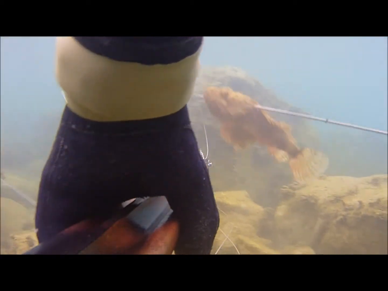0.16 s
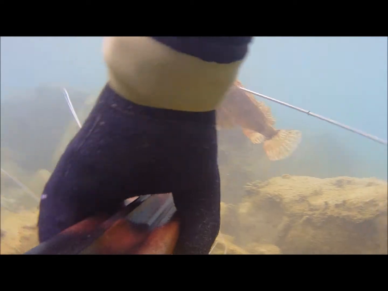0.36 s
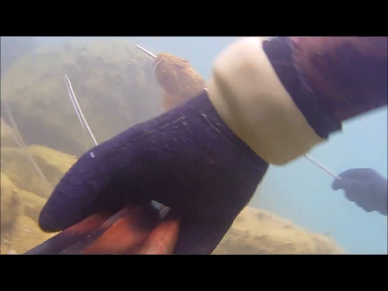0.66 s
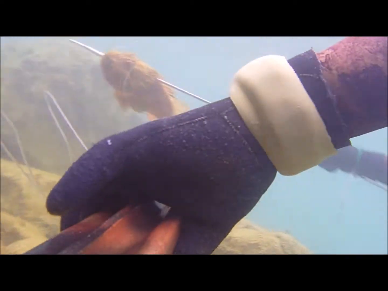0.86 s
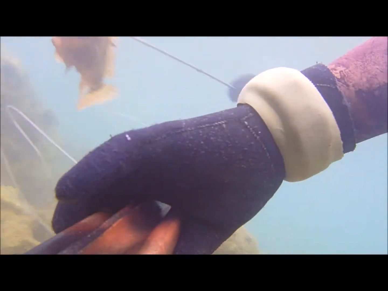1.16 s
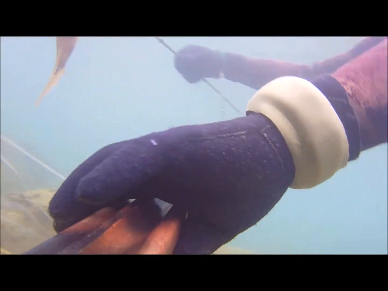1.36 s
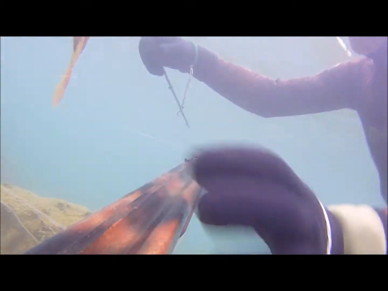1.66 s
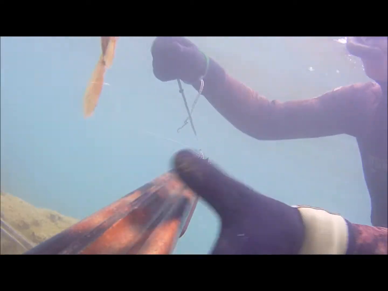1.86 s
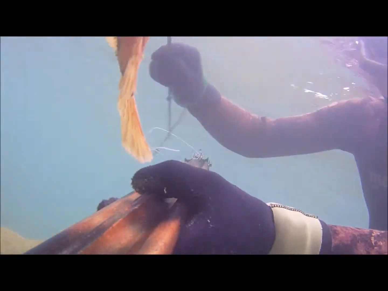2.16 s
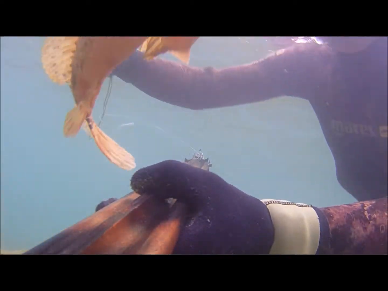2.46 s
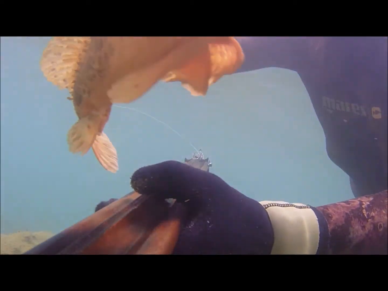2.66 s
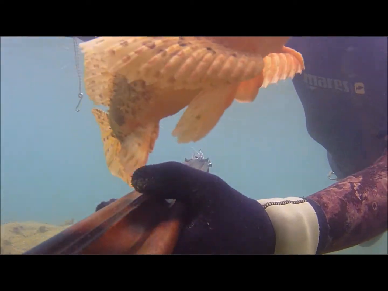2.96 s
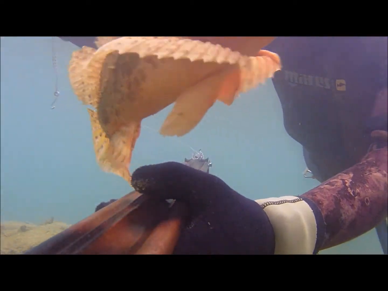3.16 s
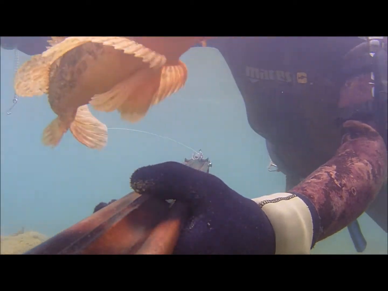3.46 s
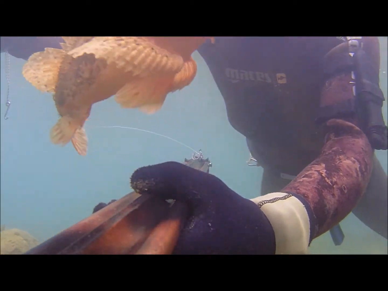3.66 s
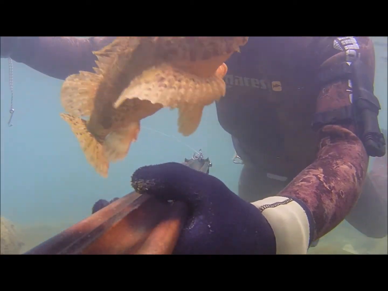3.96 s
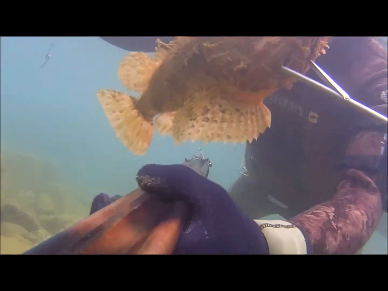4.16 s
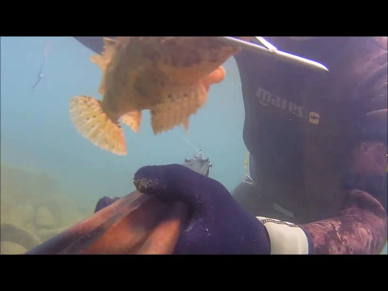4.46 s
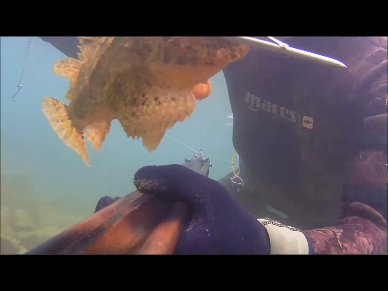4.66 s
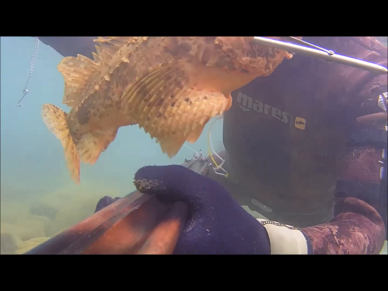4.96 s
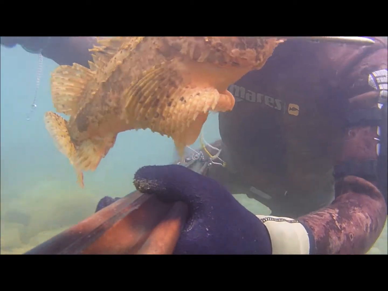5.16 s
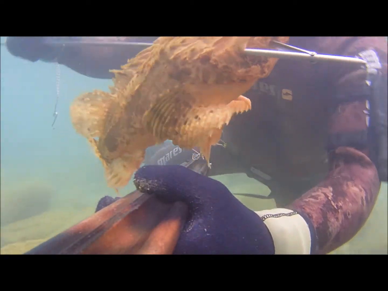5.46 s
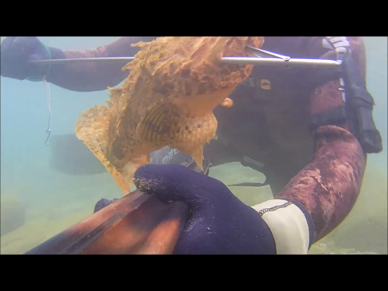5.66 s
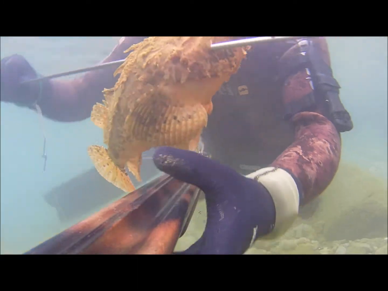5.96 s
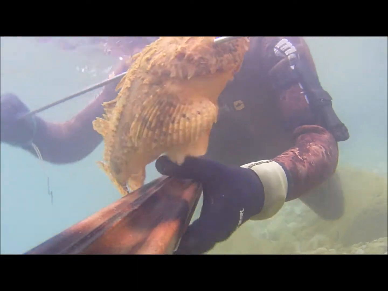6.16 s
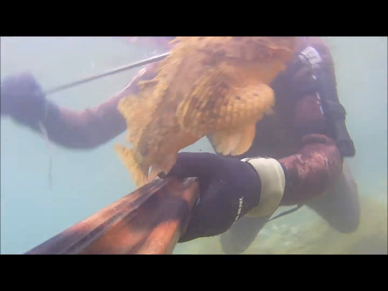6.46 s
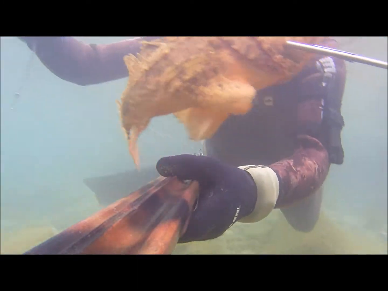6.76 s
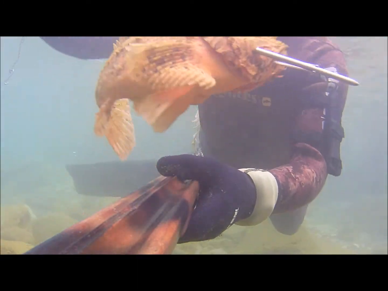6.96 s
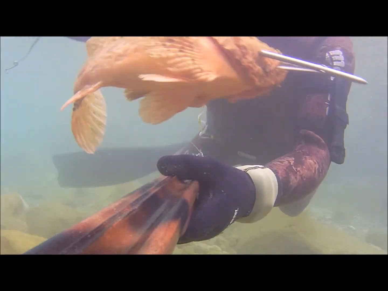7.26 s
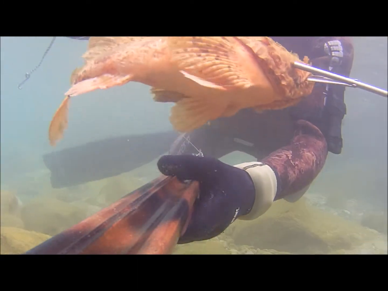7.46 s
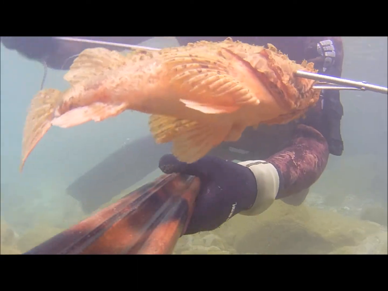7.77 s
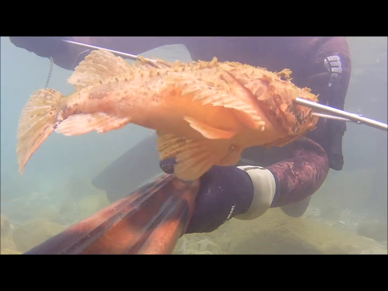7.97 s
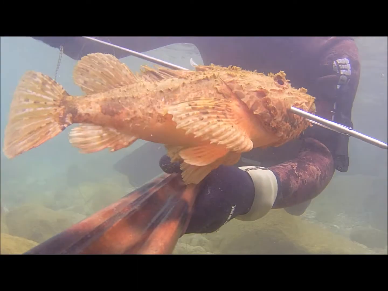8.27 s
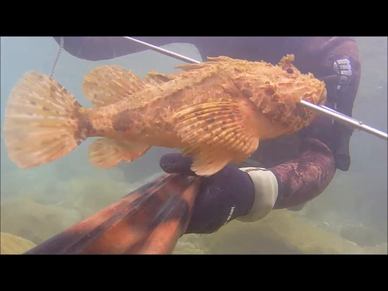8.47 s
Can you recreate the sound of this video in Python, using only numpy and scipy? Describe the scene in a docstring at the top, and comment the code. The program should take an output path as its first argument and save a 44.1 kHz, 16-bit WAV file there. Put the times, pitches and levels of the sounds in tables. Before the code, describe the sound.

A speargun fires underwater with a hard, distorted bang and low thump, amid quiet gear taps, soft rubbing and a dull, bassy watery hush.

```python
"""Under water, on a wooden speargun: one microphone in a sealed camera housing rides on the gun, close to the hands.
A hard release rattles the gun, swings the mount and overloads the recorder; blows and loose clicks ring dull modes.
Loose gear taps the gun and a gloved hand rubs it: short pushes and stick-slip grains stir the same modes.
The mount sways near 47 Hz, harder at each shove of the hand; small ticks and bumps are short decaying rings.
Behind it all lies steady, bass-heavy water and recorder noise."""
import sys
import numpy as np
from scipy import signal
from scipy.fft import rfft, irfft
from scipy.io import wavfile

SR = 44100
rng = np.random.default_rng(int(sys.argv[2]) if len(sys.argv) > 2 else 0)


def to_wav(sig):
    """Store sig (one row per channel, or 1-D mono) as 16-bit WAV at the path in sys.argv[1].

    Samples outside -1..1 are clipped; the rate is SR.
    """
    pcm = np.clip(np.atleast_2d(sig), -1, 1) * 32767
    pcm = np.round(pcm).astype(np.int16)
    wavfile.write(sys.argv[1], SR, pcm.T)  # frames by channels


N = 380141
TIME = np.arange(N) / SR   # seconds
FULL_SCALE = .46   # the recorder's overload level; every absolute level_db is relative to 1.0 ahead of the recorder


def from_db(db):
    """Decibels to gain."""
    return 10 ** (np.asarray(db) / 20)


def rms_one(x):
    """Scale to rms 1."""
    return x / np.sqrt(np.mean(x ** 2) + 1e-20)


def band(x, low_hz, high_hz, order):
    """Keep what lies between two frequencies."""
    return signal.sosfilt(signal.butter(order, [low_hz, high_hz], "band", fs=SR, output="sos"), x)


def drift(rate_hz):
    """Slow random wander of spread 1, drawn every 40 samples and joined by straight lines."""
    step = 40
    pole = np.exp(-2 * np.pi * rate_hz * step / SR)
    noise = rng.standard_normal(N // step + 2002)
    slow = signal.lfilter([1], [1, -2 * pole, pole * pole], noise)[2000:]   # drop the filter's start-up
    return np.interp(np.arange(N) / step, np.arange(len(slow)), rms_one(slow))


def ring(force, hz, t60_s):
    """One resonant mode: a unit click sets a decaying sine of height 1 ringing."""
    radius = from_db(-60 / (t60_s * SR))
    angle = 2 * np.pi * hz / SR
    return signal.lfilter([0, np.sin(angle)], [1, -2 * radius * np.cos(angle), radius ** 2], force + 1e-18)


def swell(start_s, rise_s, held_s, db, fall_db_per_s):
    """Gain that rises smoothly, holds, then dies at a steady rate in dB (the fall lasts up to 1 s)."""
    rise = np.sin(np.pi / 2 * np.clip((TIME - start_s) / rise_s, 0, 1)) ** 2
    falling_s = np.clip(TIME - start_s - rise_s - held_s, 0, 1)
    return rise * from_db(db - fall_db_per_s * falling_s)


# Housing and stock modes: pitch_hz, t60_s of a struck ring, soft_db and hard_db for a soft and a hard contact
MODES = [(276, 0.018, -21, -9), (372.6, 0.031, -8, -28), (496, 0.043, -8, -16.5), (678, 0.046, 0.5, -19.5),
         (740, 0.036, -3, -22), (940, 0.02, -10.5, 0.5), (1348, 0.019, -9.5, -8), (1618, 0.019, -28, 2),
         (2190, 0.017, -30, -33), (2788, 0.0048, -58, -6), (3380, 0.0083, -51, -17.5),
         (4700, 0.0019, -46, -28)]


def blows(table, scatter_db):
    """Each contact is a short push that swells and dies; hardness and tilt set which modes it reaches."""
    start_s, level_db, hardness, tilt_db = np.transpose(table)
    hardness = np.clip(hardness, 0, 1)
    size = 600   # samples per push
    # harder contacts are shorter; this time constant is three times that of the push's decay
    contact_ms = np.clip(3.4 - 2.96 * hardness, .3, 12)
    age = np.arange(size) / (contact_ms[:, None] * SR / 1000)
    push = age * np.exp(-3.0 * age)
    push /= push.sum(axis=1, keepdims=True)
    at = np.round(start_s * SR).astype(int)[:, None] + np.arange(size)
    luck = rng.standard_normal((len(start_s), len(MODES)))
    out = np.zeros(N)
    for k, (hz, t60_s, soft_db, hard_db) in enumerate(MODES):
        mode_db = (1 - hardness) * soft_db + hardness * hard_db
        db = level_db + mode_db + tilt_db * np.log2(hz / 1000)
        # the contact chatters near the mode's pitch, so the ring builds up over the push
        pitch_hz = hz * (1 + .03 * luck[:, [k - 2]])
        phase = luck[:, [k - 1]]
        chatter = 2 * push * np.cos(2 * np.pi * pitch_hz * np.arange(size) / SR + phase)
        gain = from_db(db + scatter_db * luck[:, k])
        force = np.zeros(N)
        np.add.at(force, at, gain[:, None] * chatter)
        out += ring(force, hz, t60_s)
    return out


def rattle():
    """Loose parts buzz against the stock while the bands let go: uneven clicks into the modes plus bare fizz."""
    clicks_per_s = 12000
    clicks = rng.standard_normal(N) ** 3 * (rng.random(N) < clicks_per_s / SR)
    body = sum(from_db(soft_db) * rms_one(ring(clicks, hz, t60_s)) for hz, t60_s, soft_db, _ in MODES)
    fizz = band(clicks, 2500, 8000, order=3)
    start_s, rise_s, held_s = 4.059, 0.013, 0.031
    shake = swell(start_s, rise_s, held_s, db=-16, fall_db_per_s=1197)   # stops short
    shake += swell(start_s, rise_s, held_s, db=-25, fall_db_per_s=442)   # a faint rest settles slowly
    return shake * rms_one(body) + from_db(-15.0) * shake ** 2 * rms_one(fizz)   # harder shaking is brighter


# Blows of the release: start_s, level_db before mode and tilt gains, hardness (0-1), tilt_db per octave about 1 kHz
RELEASE_BLOWS = [(4.0605, -11.5, 0.12, -2.5), (4.0685, -10.5, 0.01, -2), (4.073, -15, 0.03, -7),
                 (4.0785, -7.5, 0.94, 10.5), (4.0822, 5.5, 0.7, 2), (4.0848, 6, 0.6, 2),
                 (4.0905, -22, 1, 21.5), (4.0965, -17, 0.4, -5), (4.099, -3, 0.65, 2), (4.1015, -2, 0.8, 5),
                 (4.107, -10, 0.89, -1), (4.111, -26, 0.7, 6), (4.1265, -18, 0.7, 7),
                 (4.1315, -10, 0.76, 4.5), (4.1345, -22, 0.3, -11.5), (4.1435, -14.5, 0.78, -7),
                 (4.1455, -21, 0.82, 1)]


def release():
    """Blows and rattle, with the rumble below about 200 Hz cut."""
    low_cut = signal.butter(2, 200, "high", fs=SR, output="sos")
    return signal.sosfilt(low_cut, blows(RELEASE_BLOWS, scatter_db=3.0) + rattle())


# Taps on the gun: start_s, level_db before mode and tilt gains, hardness (0-1), tilt_db per octave about 1 kHz
GEAR_TAPS = [(0.101, -37, 0.1, 2.5), (0.8, -39, 0.5, -3), (1.496, -34, 0.3, -2.5),
             (1.709, -31.5, 0.17, 15.5), (1.772, -31.5, 0.1, 5), (1.779, -41, 0.25, 18),
             (1.802, -42, 0.05, 8), (1.807, -28.5, 0.12, 6), (1.866, -32.5, 0.27, 7.5),
             (2.067, -29, 0.75, -3), (2.071, -31, 0.2, 4), (2.083, -24.5, 0.62, 2.5), (2.09, -36, 0.77, 0),
             (2.097, -26, 0.59, 4), (2.103, -34, 0.4, -5), (2.138, -20, 0.51, -1.5), (2.31, -22, 0.78, 1.5),
             (2.444, -23, 0.81, -0.2), (2.549, -31, 0.68, -1.5), (3.147, -40, 0.65, -9), (3.336, -45, 0, 3),
             (3.432, -42.5, 0.02, 5), (3.472, -39, 0.63, -5), (4.25, -18.5, 0.65, 4),
             (4.309, -34.5, 0.57, -7), (4.418, -34, 0.1, 10), (4.456, -38, 0.4, -2), (4.487, -33, 0.66, -3),
             (4.633, -37.5, 0, 1.5), (4.744, -33.5, 0, 2), (6.262, -35, 0, 0), (6.271, -31, 0.17, -10.5),
             (6.289, -43, 0.7, -2), (6.3065, -15, 0.64, 2.5), (6.35, -38, 0.1, 16), (6.495, -37, 0, 6),
             (6.6535, -22.5, 0.45, -7), (6.6555, -10, 0.44, 4.5), (6.804, -18, 0.79, 2),
             (7.003, -32, 0.61, -5), (7.142, -35.5, 0.6, -3), (7.497, -41.5, 0, 0), (7.722, -37.5, 0, -0.5),
             (8.492, -27.5, 0.69, -7)]


def taps():
    """Loose gear knocks the stock and rings the same modes as the release."""
    return blows(GEAR_TAPS, scatter_db=1.5)


# The release throws the mount, and it rebounds once: start_s, level_db, fall_db_per_s
RECOIL_SWINGS = [(4.065, 8.5, 640), (4.132, -13, 311)]
# Shoves of the hand that set the mount swinging: start_s, held_s, level_db (rms)
HAND_SHOVES = [(.645, 0.013, -42), (1.555, 0.024, -44), (1.63, 0.033, -35), (1.93, 0.053, -35),
               (2.05, 0.015, -32.5), (2.112, 0.02, -36), (2.19, 0.049, -34.5), (4.205, 0.071, -41),
               (4.305, 0.1, -36.5), (4.525, 0.026, -42), (4.89, 0.011, -51), (6.284, 0.028, -33),
               (6.37, 0.061, -39.5), (6.52, 0.034, -43.5), (7.56, 0.058, -50), (7.67, 0.089, -44),
               (7.77, 0.074, -39.5)]
# Restless sway in the diver's grip: time_s, level_db (rms of the main mode), joined by straight lines
SWAY_LEVEL = [(0, -47.5), (.45, -63.5), (.6, -50.5), (1.1, -52.5), (1.3, -65), (1.45, -45.5), (2.5, -47.5),
              (2.8, -64), (3.3, -58.5), (4.0, -52.5), (4.6, -56), (5.45, -52.5), (5.55, -70), (6.2, -50.5),
              (6.65, -53.5), (6.8, -62), (7.5, -64), (8.62, -59.5)]
MOUNT_HZ = 47.


def restless_sway(hz):
    """Noise through the same 0.21 s resonance twice: a wavering tone of rms 1."""
    t60_s = 0.21
    push = rng.standard_normal(N)
    return rms_one(ring(ring(push, hz, t60_s), hz, t60_s))


def recoil():
    """The release kicks the mount one way, then it swings; its overtone bends the swing from the crest on."""
    kick_s, kick_ms, crest_s = 4.06, 7.5, 4.0918
    kick = from_db(-7.5) * np.sin(np.pi * np.clip((TIME - kick_s) * 1000 / kick_ms, 0, 1))
    since = TIME - crest_s
    swing = np.cos(2 * np.pi * MOUNT_HZ * since)
    # the overtone makes each swing rise fast and sink slowly
    fade = np.where(since > 0, np.exp(-np.maximum(since, 0) / .08), 0)
    swing -= .46 * np.sin(2 * np.pi * 94. * since) * fade
    strength = sum(swell(start_s, 0.026, 0, db, fall) for start_s, db, fall in RECOIL_SWINGS)
    return kick + strength * swing


def mount():
    """The camera mount's low resonance: a restless sway, shoves of the hand, and the recoil of the release."""
    # handling also stirs a weaker upper mode
    sway = restless_sway(MOUNT_HZ) + from_db(-13) * restless_sway(103.6)
    sway = sway * from_db(np.interp(TIME, *np.transpose(SWAY_LEVEL)))
    shoves = np.zeros(N)
    for start_s, held_s, db in HAND_SHOVES:
        phase = rng.uniform(0, 2 * np.pi)
        strength = swell(start_s, 0.019, held_s, db, fall_db_per_s=278)
        shoves += strength * np.sin(2 * np.pi * MOUNT_HZ * TIME + phase)
    return sway + np.sqrt(2) * shoves + recoil()   # root 2 turns a sine's rms into its peak


# Glove strokes on the stock: start_s, held_s, level_db before mode and tilt gains, tilt_db per octave about 700 Hz
GLOVE_STROKES = [(.02, 0.49, -65, 6), (0.51, 0.074, -57.5, 4), (0.576, 0.086, -49.5, 2),
                 (.77, 0.21, -62.5, 3), (1.36, 0.17, -58.5, 5.5), (1.562, 0.05, -50, 1),
                 (1.74, 0.12, -60.5, 1), (1.913, 0.037, -50.5, 3), (2.03, 0.071, -55, -6),
                 (4.18, 0.23, -62, 1), (4.6, 0.067, -61, -4), (5.68, 0.096, -63, -4),
                 (6.079, 0.067, -48.5, 2.5), (6.249, 0.0042, -49, -13), (6.36, 0.22, -67.5, -2),
                 (7.49, 0.015, -59, 4), (7.635, 0.012, -57, -2), (7.7, 0.012, -65.5, -21.5)]


def glove():
    """Stick-slip grains of neoprene on wood; each soft-contact mode swells and fades as the grip wanders."""
    rise_s, fall_db_per_s = 0.047, 263
    grains = rng.standard_normal((2, N))
    grains = grains * np.sqrt(np.abs(grains)) * from_db(1.5 * drift(60))   # the slips come in clumps
    strokes = np.array([swell(start_s, rise_s, held_s, 0, fall_db_per_s)
                        for start_s, held_s, *_ in GLOVE_STROKES])
    level_db, tilt_db = np.transpose(GLOVE_STROKES)[2:]
    # one heavier drag of the palm stirs the mode near 500 Hz
    drag_hz, drag_t60_s = MODES[2][:2]
    out = swell(1.92, rise_s, 0.01, -44.5, fall_db_per_s) * rms_one(ring(grains[1], drag_hz, drag_t60_s))
    for k, (hz, t60_s, soft_db, _) in enumerate(MODES):
        strength = from_db(soft_db + level_db + tilt_db * np.log2(hz / 700)) @ strokes
        grip = from_db(1.84 * drift(14.5))
        out += strength * grip * rms_one(ring(grains[k % 2], hz, 1.82 * t60_s))   # rubbed modes ring longer
    return out


def pips(table, cycles, upper, crack_db):
    """Short rings that fall 60 dB in a few cycles, with a rough neighbour above and a broad snap in front."""
    out = np.zeros(N)
    age = np.arange(3000) / SR   # seconds
    snaps = band(rng.standard_normal((len(table), len(age))), 1800, 4200, order=2)
    snap_decay_ms = 1.5
    snaps = from_db(crack_db) * rms_one(snaps) * np.exp(-age * 1000 / snap_decay_ms)
    for (start_s, level_db, pitch_hz), snap in zip(table, snaps):
        turns = pitch_hz * age
        wave = np.sin(2 * np.pi * turns) + upper * np.sin(2 * np.pi * 1.85 * turns)
        wave = wave * (1 - np.exp(-turns / 0.57)) * np.exp(-np.log(1000) * turns / cycles)
        out[round(start_s * SR):][:len(age)] += from_db(level_db) * (wave / np.abs(wave).max() + snap)
    return out


# Small bright ticks: start_s, level_db (peak of the ring without its snap), pitch_hz
BRIGHT_TICKS = [(0.7144, -48, 2320), (0.7588, -53, 1910), (1.4413, -48.5, 2220), (1.709, -40, 2060),
                (2.6684, -45, 2100), (6.2592, -49, 2170), (7.5393, -49, 2340), (7.5916, -48, 2370)]


def ticks():
    """Clear high rings of many cycles, each opened by a snap."""
    return pips(BRIGHT_TICKS, cycles=30.0, upper=0, crack_db=-15)


# Dull bumps of the housing: start_s, level_db (peak of the ring without its snap), pitch_hz
DULL_BUMPS = [(2.068, -32.5, 107), (2.139, -33, 237), (3.148, -38.5, 168), (6.268, -33.5, 100),
              (7.004, -40, 158), (7.343, -39, 195), (7.762, -35, 103), (8.492, -38.5, 185)]


def bumps():
    """Low rings that die in four cycles, roughened by an upper tone, with hardly any snap."""
    return pips(DULL_BUMPS, cycles=4.0, upper=0.57, crack_db=-45)


# Water and recorder noise: pitch_hz, relative level_db of the spectrum
HISS_COLOUR = [(11, -34), (18, 6.5), (49, -8), (90, -6.5), (230, -5.5), (657, -10), (1980, -23),
               (6900, -34), (14400, -37), (15700, -33.5)]


def hiss():
    """Steady noise, heavy in the bass: white noise coloured by a smooth spectrum, at -55 dB rms."""
    hz, db = np.transpose(HISS_COLOUR)
    bins_hz = np.maximum(np.fft.rfftfreq(N, 1 / SR), 1)
    colour = from_db(np.interp(np.log(bins_hz), np.log(hz), db))
    return from_db(-55) * rms_one(irfft(rfft(rng.standard_normal(N)) * colour, N))


def scene():
    """All the sources meet at one microphone in the housing."""
    return (release() + taps() + mount() + glove() + ticks() + bumps() + hiss())[None]


def record(dry):
    """Overload that flattens the peaks, a little bright grain on the flattened parts, a high-pass, a steep top cut."""
    x = dry / FULL_SCALE
    flat = x / (1 + np.abs(x) ** 6.) ** (1 / 6.)
    grain = signal.lfilter(*signal.butter(1, 2500, "high", fs=SR), x - flat)
    clipped = FULL_SCALE * (flat + .1 * np.tanh(1.5 * grain))
    coupled = signal.lfilter(*signal.butter(1, 1.2, "high", fs=SR), clipped)
    return signal.sosfilt(signal.cheby2(12, 70, 16700, fs=SR, output="sos"), coupled)


dry = scene()
out = record(dry)
to_wav(out)
```